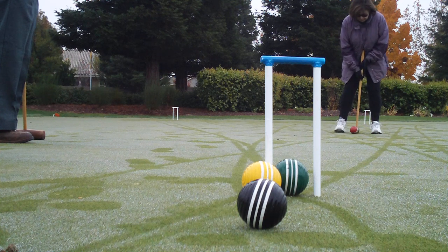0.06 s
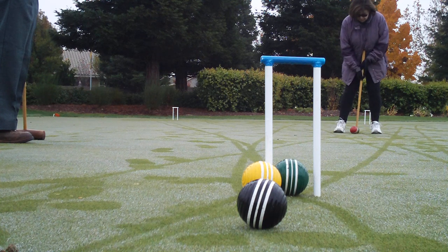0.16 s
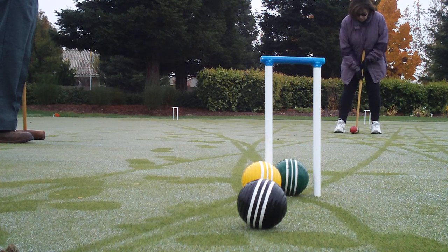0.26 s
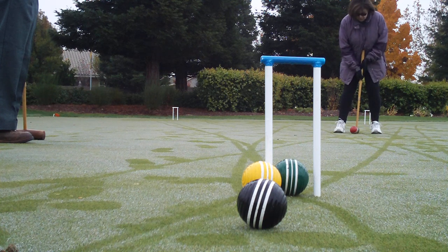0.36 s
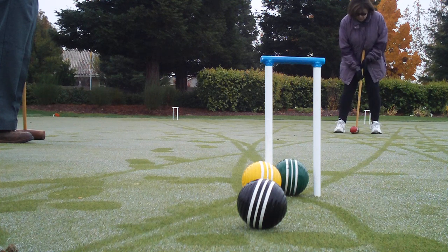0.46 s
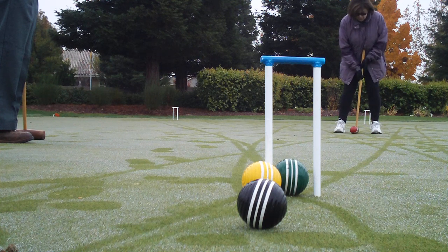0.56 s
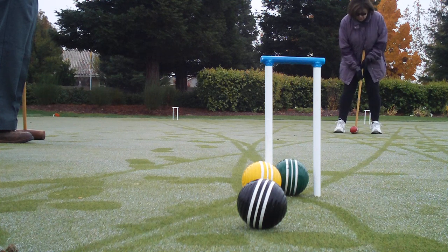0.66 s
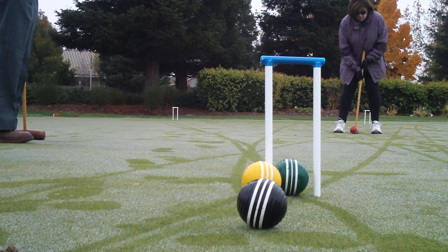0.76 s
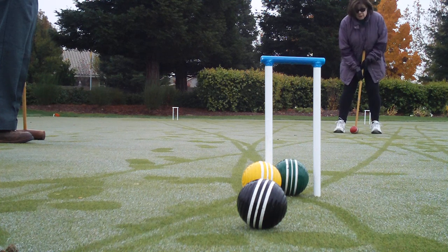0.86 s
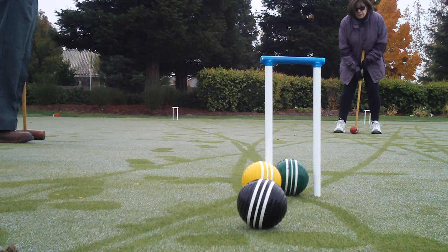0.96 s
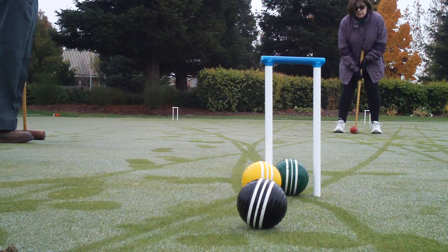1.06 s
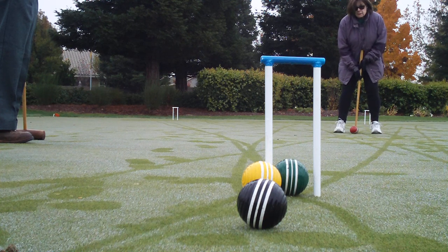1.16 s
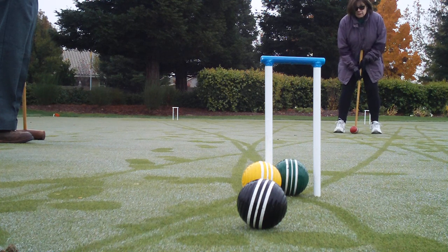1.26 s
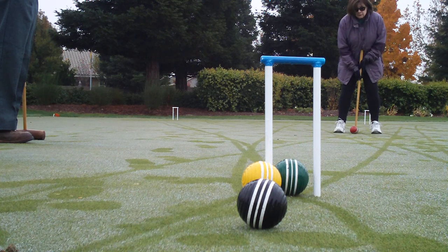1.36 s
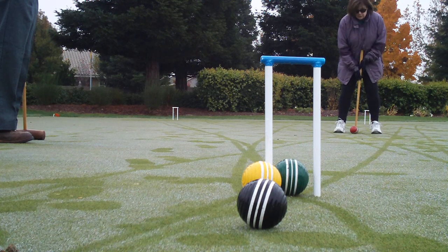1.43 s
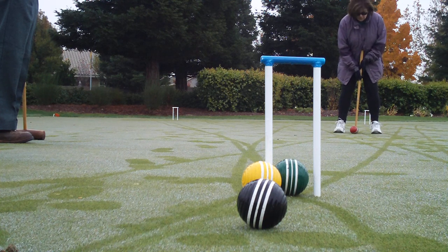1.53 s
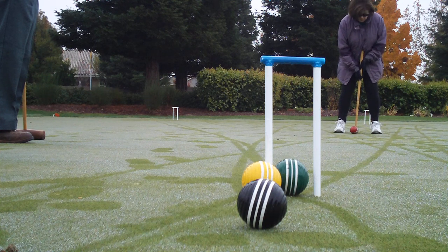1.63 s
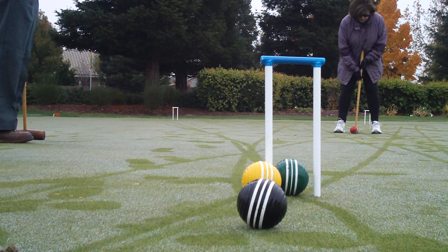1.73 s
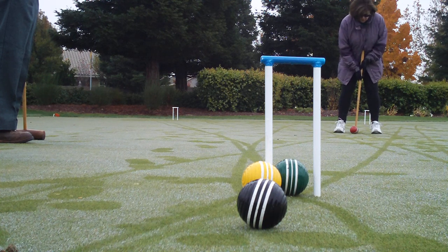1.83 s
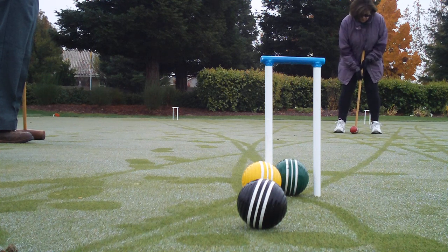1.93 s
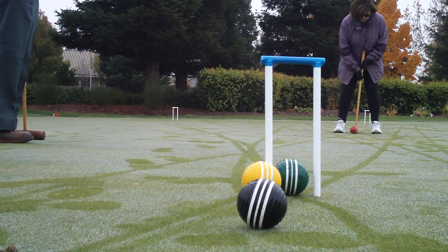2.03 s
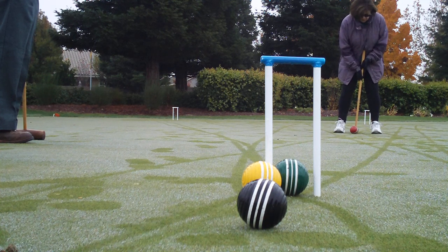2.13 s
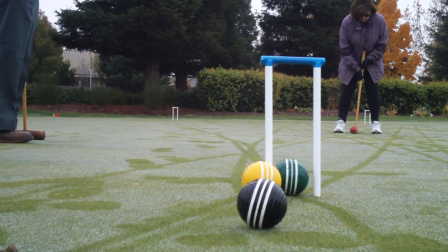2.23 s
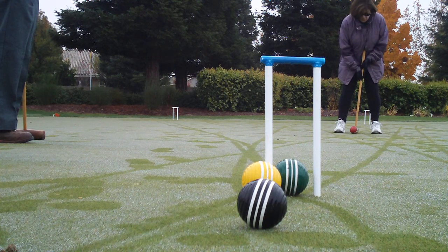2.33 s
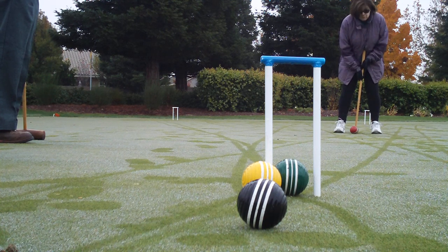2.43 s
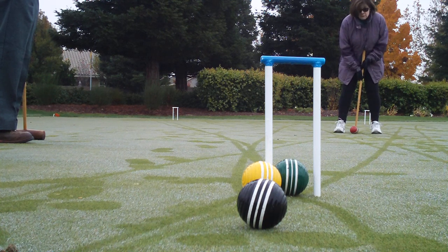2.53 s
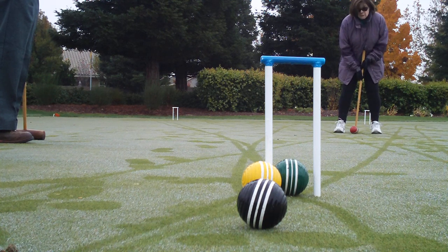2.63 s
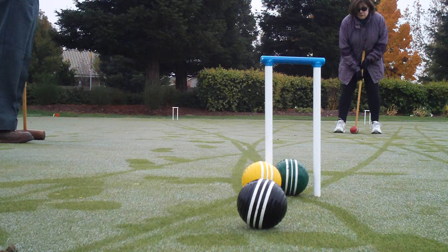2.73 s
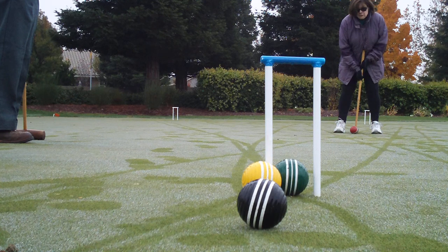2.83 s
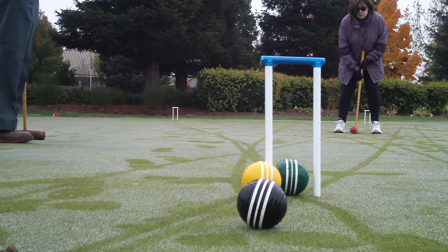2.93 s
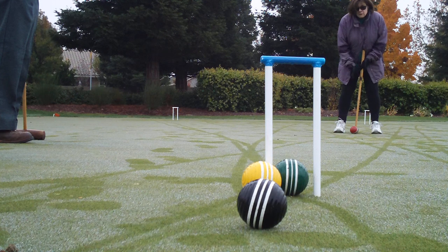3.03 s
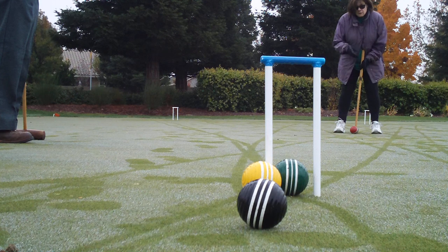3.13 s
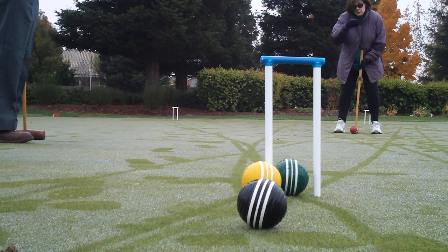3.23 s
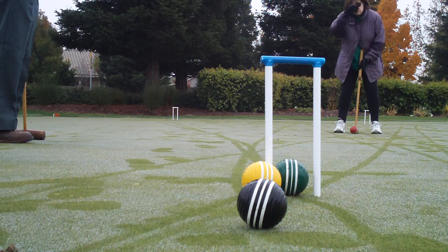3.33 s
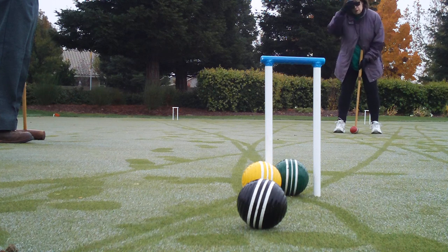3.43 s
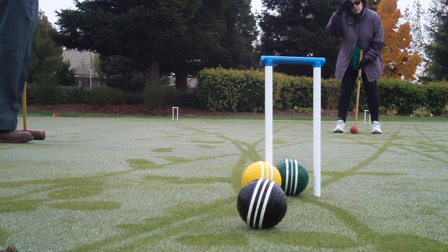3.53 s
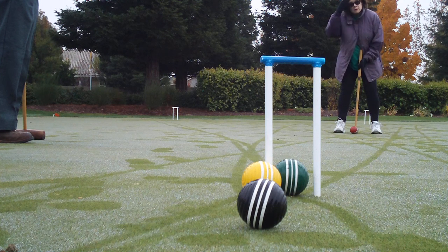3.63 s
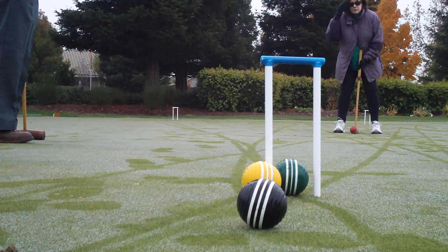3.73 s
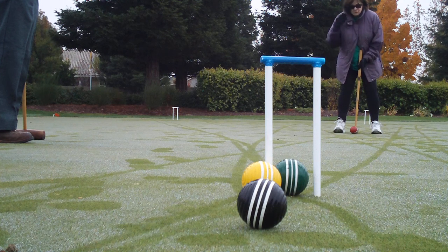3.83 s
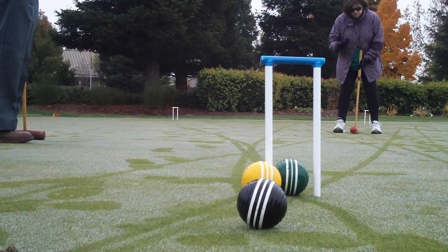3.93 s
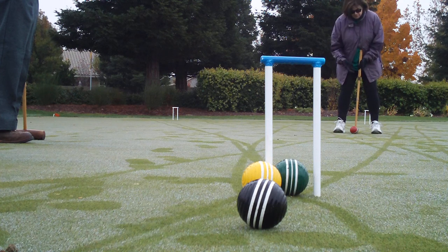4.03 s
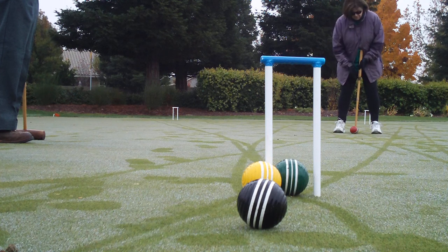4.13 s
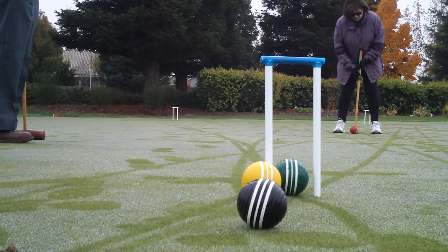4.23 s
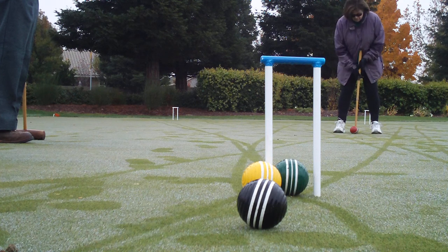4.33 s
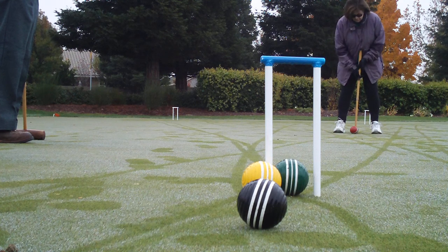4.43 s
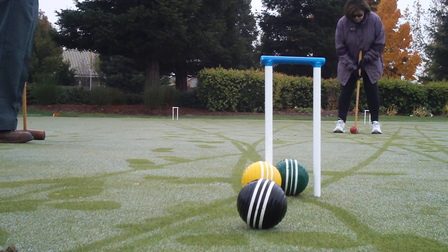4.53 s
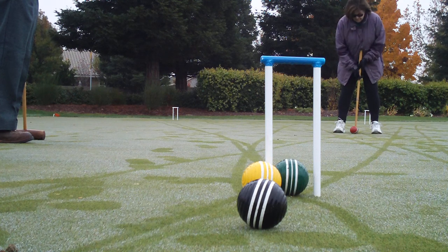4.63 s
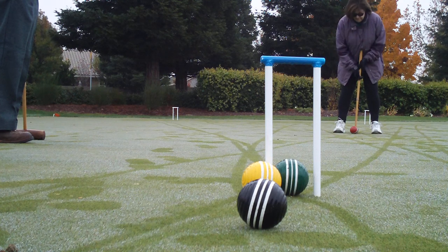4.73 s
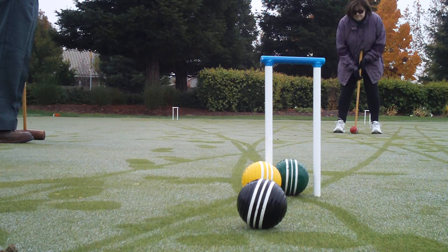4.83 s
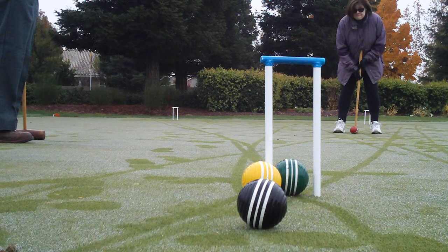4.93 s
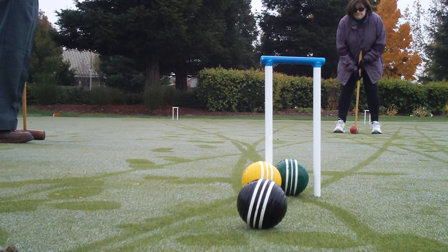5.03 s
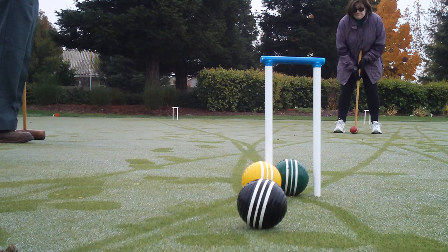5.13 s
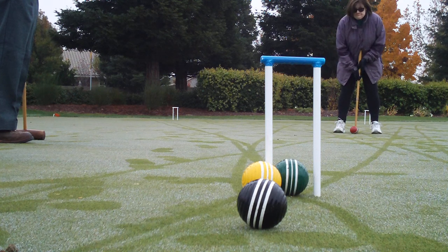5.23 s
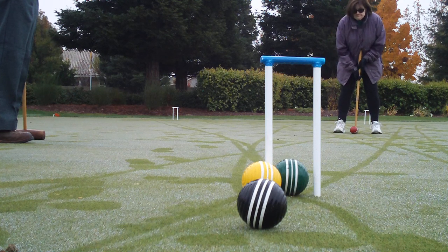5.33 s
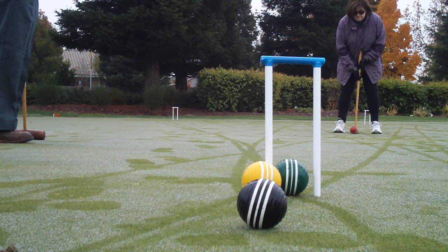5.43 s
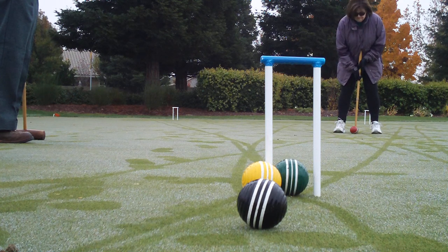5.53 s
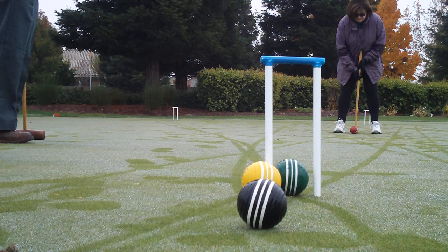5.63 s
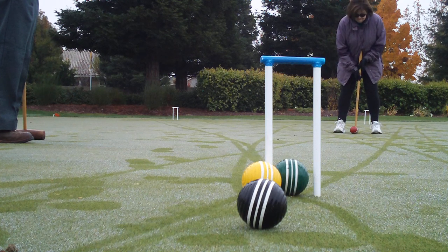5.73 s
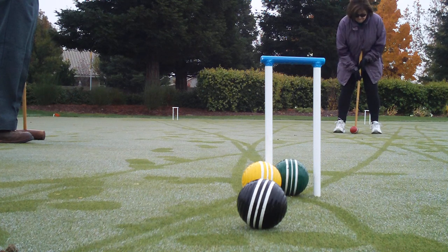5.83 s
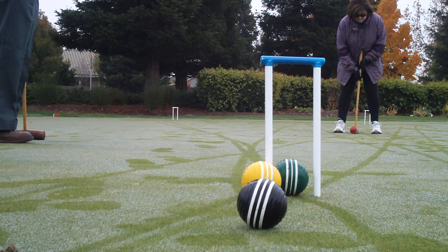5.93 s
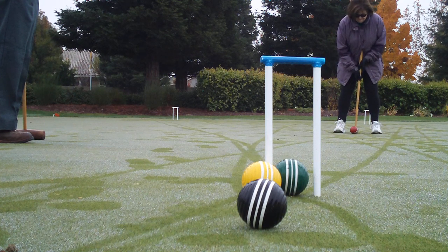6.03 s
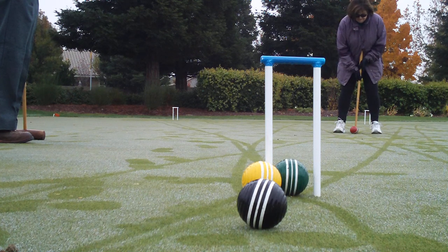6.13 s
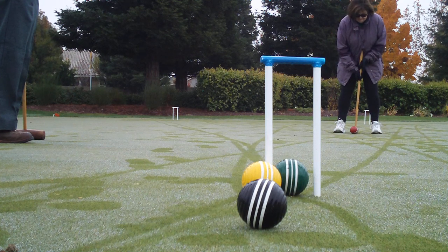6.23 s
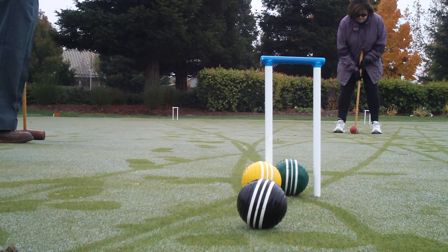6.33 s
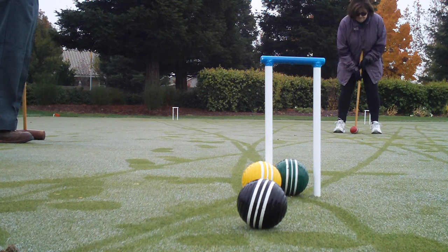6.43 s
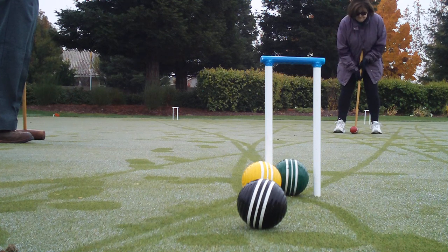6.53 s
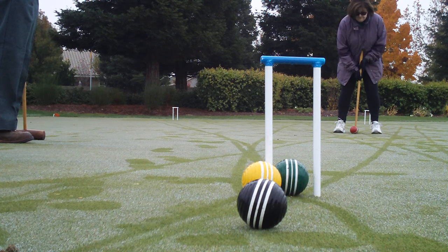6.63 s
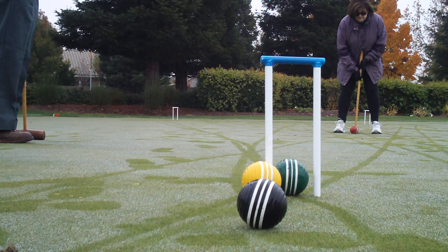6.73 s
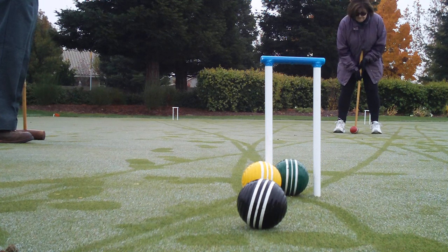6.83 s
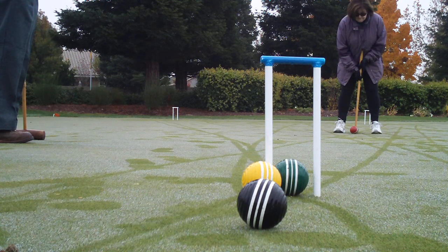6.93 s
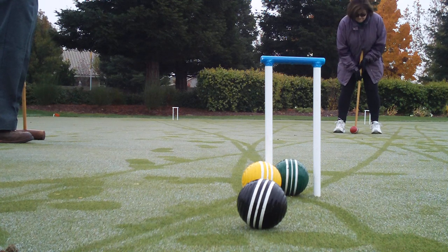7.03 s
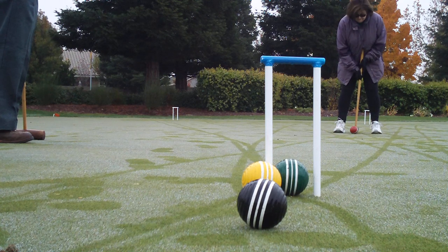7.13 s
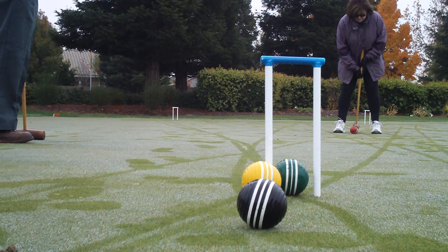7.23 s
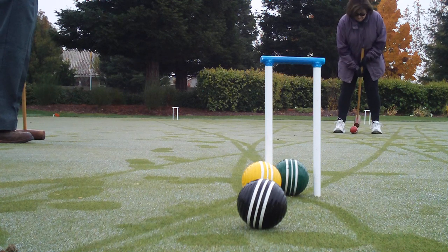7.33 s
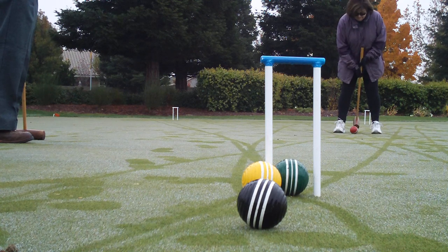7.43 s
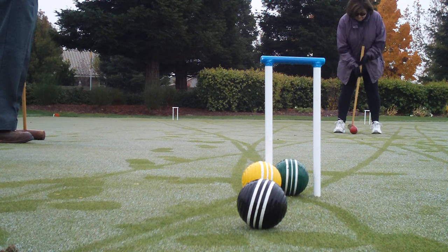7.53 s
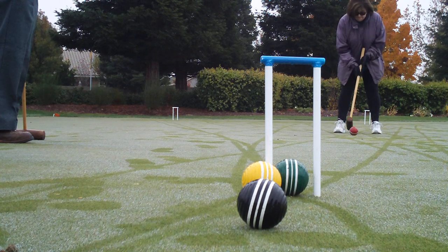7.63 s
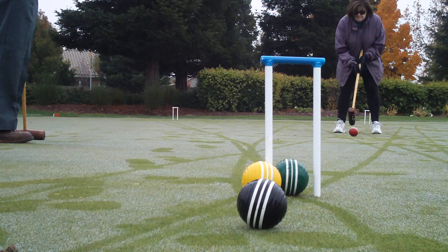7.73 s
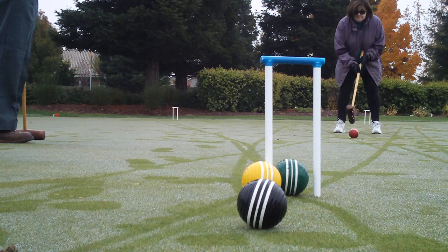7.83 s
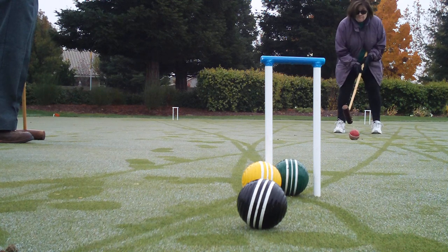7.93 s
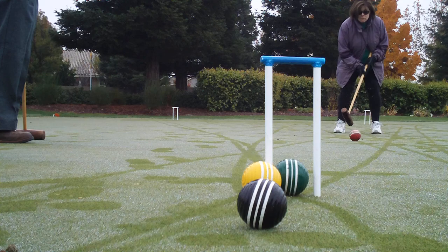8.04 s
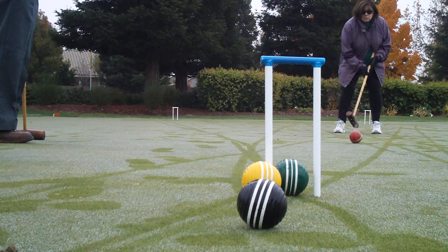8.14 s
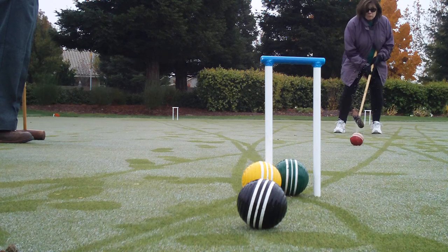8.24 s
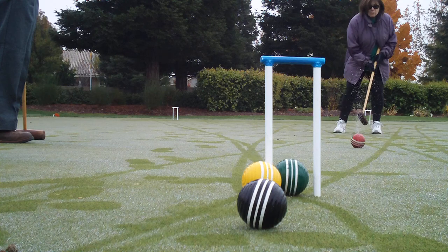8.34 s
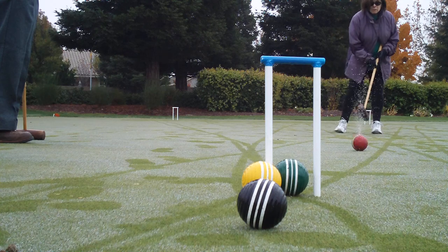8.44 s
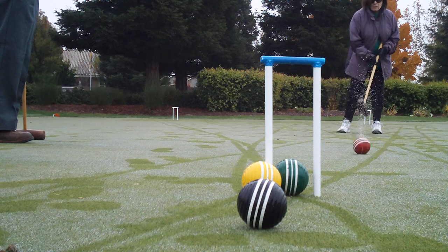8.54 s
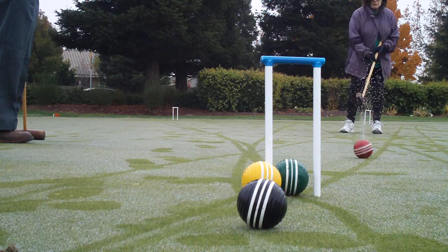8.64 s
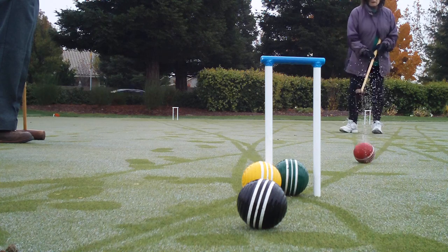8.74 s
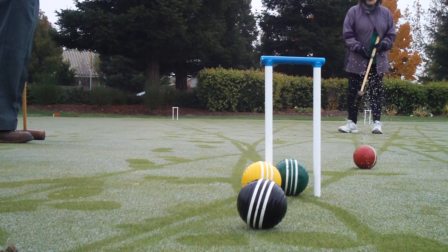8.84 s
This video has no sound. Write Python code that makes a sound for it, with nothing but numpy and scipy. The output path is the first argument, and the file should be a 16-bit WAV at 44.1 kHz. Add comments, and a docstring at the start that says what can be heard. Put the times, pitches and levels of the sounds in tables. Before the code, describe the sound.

A quiet lawn with deep distant traffic rumble, tiny bird calls and a car swelling past, broken by one loud, short mallet knock on a ball.

```python
"""An open lawn beside a town road, where a mallet cracks once against a ball.
Underneath lie shaped-noise town rumble and a far motor's hum, built from sines. Beyond the hedge a car drives by,
its noise layers rising and falling with distance. Small birds chirp in gliding sines and buzz in narrow noise.
A camera's circuits add faint hiss, whine, pips and fizz. The crack is a contact push with a swing-back,
a ground bounce, decaying ring modes and short noise bursts."""
import sys
import numpy as np
from scipy import signal
from scipy.io import wavfile
from scipy.ndimage import uniform_filter1d

SR = 44100
rng = np.random.default_rng(int(sys.argv[2]) if len(sys.argv) > 2 else 0)


def master(y):
    """Save y as 16-bit WAV."""
    cut = np.clip(np.atleast_2d(y).T, -1, 1)
    pcm = np.round(cut * 32767)  # scale
    wavfile.write(sys.argv[1], SR, pcm.astype(np.int16))


N = 391166

# Town rumble and broad hiss, spectrum shape: (frequency [Hz], relative density [dB per Hz])
RUMBLE_SPECTRUM = [(12, -25), (20, -1.5), (38, -5.5), (50, 1), (90, -1.5), (110, -6.5), (213, -17),
                   (260, -16), (310, -26.5), (430, -31), (1070, -47.5), (2600, -50.5), (4100, -47),
                   (6100, -54.5), (8700, -52.5), (15200, -60), (15400, -110)]
RUMBLE_DB = -36  # before the bass swell
# The bass of the rumble grows slowly, wanders, and surges once
BASS_RISE_DB_PER_S, BASS_WANDER_DB = 0.3156, 0.56
SURGE_S, SURGE_WIDTH_S, SURGE_DB = 7.19, 0.29, 4.5
MOTOR_HZ = 15.17
# Motor orders, drifting as the air shifts: (multiple of MOTOR_HZ, start level [dB rms], end level [dB rms])
MOTOR_ORDERS = [(2, -46, -46), (6, -50, -50), (15, -61, -62), (16, -52, -60), (17, -57, -56),
                (18, -60, -52), (22, -63, -70)]

# Hiss of opposite sign in the two channels: (frequency [Hz], relative density [dB per Hz])
SIDE_HISS_SPECTRUM = [(6, 0), (22, 14), (40, 23.5), (80, 21.5), (150, -11), (600, -9), (1200, -25.5),
                      (3000, -5), (6700, 3.5), (7000, -3), (8100, -9), (8400, 3.5), (12500, 1.5),
                      (15000, -1), (15300, -50)]
# Housing resonances in the hiss, before it pulses: (frequency [Hz], width [Hz], level [dB rms])
HOUSING_RESONANCES = [(3450, 330, -80.5), (5540, 210, -79.5), (7480, 960, -68.5), (8030, 300, -78.5),
                      (9400, 1300, -78.5), (11380, 500, -78), (12800, 700, -80), (14100, 400, -82),
                      (15150, 250, -81)]
FRAME_HZ = 30 / 1.001  # picture rate
# Thin steady circuit tones: (frequency [kHz], level [dB rms])
CLOCK_TONES = [(5, -88), (7, -90), (8, -89), (9, -92), (11, -91), (12, -92), (14, -94)]
# Whines: (multiple of the picture rate, level [dB rms], loss to the first neighbours [dB])
WHINE_CLUSTERS = [(250, -73, 8), (500, -79, 8.5)]
NEIGHBOUR_STEP_DB = 5  # further loss to the second neighbours
LONE_WHINE = (262.5, -77)  # (multiple of the picture rate, level [dB rms])
# Fizz bursts within each cycle of fifteen pictures: (start [s], relative level [dB])
FIZZ_BURSTS = [(.02, 5), (.08, 2), (.29, 2), (.38, 6), (.45, -4), (.48, 7)]
BURST_S, LULL_FROM_S, LULL_TO_S, LULL_DB = .02, .1, .38, -3.5

# Tyre roar: (frequency [Hz], relative density [dB per Hz])
TYRE_SPECTRUM = [(100, -9), (200, 6.5), (500, -9), (800, -2), (1250, -1), (2000, -5), (3500, -17),
                 (8000, -22), (14000, -45)]
# Deeper body tone of the car: (frequency [Hz], relative density [dB per Hz])
BODY_SPECTRUM = [(200, -25), (350, 1.5), (600, -1), (850, -5), (1300, -19), (3000, -18.5), (8000, -33.5)]
# Low drone of the car: (frequency [Hz], relative density [dB per Hz])
DRONE_SPECTRUM = [(50, -20), (110, -1.5), (220, 3.5), (350, -8.5), (500, -20), (1000, -52)]
# The car drives past on a straight road
NEAREST_S, ROAD_M, SPEED_M_PER_S = 7.83, 18.5, 13.2
# Base levels at the nearest point; the drone fades as distance to the power DRONE_SPREAD
ROAR_DB, DRONE_DB, DRONE_SPREAD = -49, -41.5, 0.95
# The body tone takes over from the tyres: power share 0-1 before and after the turn
BODY_BEFORE, BODY_AFTER, BODY_S, BODY_TURN_S = 0.35, 0.72, 6.4, 0.15
# The body tone swells once before the car is abreast
BOOM_S, BOOM_WIDTH_S, BOOM_DB = 6.85, 0.22, 2.5
# The tyre roar swells briefly at the nearest point
SWISH_WIDTH_S, SWISH_DB = 0.24, 2.5
# A low engine note stands out and sinks as the car passes
NOTE_S, NOTE_LENGTH_S, NOTE_FROM_HZ, NOTE_TO_HZ, NOTE_DB = 7.45, .5, 272, 222, -50

# Two-voiced rising chirps: (time [s], upper voice level [dB], lower voice level [dB])
CHIRP_NOTES = [(.919, -60, -60.5), (2.017, -60, -61), (4.179, -68, -64), (5.586, -57.5, -66),
               (6.298, -68, -73), (6.722, -64, -76)]
# Buzzy notes: (time [s], length [s], pitch [Hz], main band level [dB], upper band relative to main [dB])
BUZZ_NOTES = [(0.543, .07, 5500, -67, 0), (1.083, 0.05, 5400, -64, -7), (1.696, .065, 5400, -66.5, -3),
              (2.32, 0.042, 5400, -69, -1), (3.09, 0.041, 5560, -62, -5), (3.765, 0.086, 5380, -68.5, 0),
              (4.18, .04, 5700, -72, 0), (4.888, .045, 5450, -72, 6), (5.541, 0.043, 5550, -65, 0),
              (6.14, 0.045, 5400, -67.5, -1), (6.78, .055, 5350, -65, -1), (7.565, 0.062, 5350, -68, -6),
              (8.11, 0.046, 5400, -69, -5), (8.73, 0.059, 5500, -66.5, 2)]
BUZZ_SPLIT_HZ = 390
# Arched and falling whistles: (time [s], length [s], four pitch points [Hz, Hz, Hz, Hz], level [dB])
WHISTLE_NOTES = [(2.143, .036, 3900, 4280, 4200, 2950, -64.5), (2.194, .024, 2950, 4050, 3900, 3050, -65.5),
                 (4.553, .027, 4600, 4520, 4200, 3450, -68.5), (4.584, .038, 4250, 3800, 3450, 3150, -69.5)]

BLOW_S, BLOW_DB = 7.63061, -.3
BOUNCE_S, BOUNCE_GAIN = 0.00188, -0.18  # the knock comes back inverted off the ground
# Ring of mallet head and ball: (frequency [Hz], level within the ring [dB], decay by 60 dB [s])
HEAD_MODES = [(262, -19, 0.16), (352, -38, 0.025), (2400, -3, 0.011), (3350, -13, 0.019),
              (3700, -2.5, 0.0092), (4120, -4, .011), (4900, -4, 0.0096), (5400, -0.5, 0.008),
              (5900, -7, .011), (6620, -10, .013), (7190, -10.5, .015), (7870, -13, .013),
              (8760, -18, .012), (9080, -14.5, .012), (9610, -17, .013), (10950, -13.5, 0.0095),
              (11900, -12, 0.0095)]

# Resting voltage of each channel: (offset [fraction of full scale])
CHANNEL_OFFSETS = [
    [.0062],
    [-.0078],
]
HISS_EDGE_HZ, EDGE_HZ = 15330, 16400  # treble edges of the bed and of the whole mix


def gain_of(db):
    """Decibels to amplitude gain."""
    return 10 ** (np.asarray(db) / 20)


def evened(x):
    """Scales a sound to rms 1."""
    return x / np.sqrt(np.mean(x ** 2) + 1e-20)


def read(points, hz):
    """Reads a spectrum curve on a log-frequency axis."""
    f, value = np.transpose(points)
    return np.interp(np.log(hz + 1), np.log(f + 1), value)


def bump(t, centre_s, width_s):
    """A smooth bell that peaks at 1."""
    return np.exp(-((t - centre_s) / width_s) ** 2)


def add(mix, s, sound):
    """Mixes a sound in at time s."""
    part = mix[round(s * SR):][:len(sound)]
    part += sound[:len(part)]


def low_pass(x, edge_hz):
    """Steep treble cut in each channel."""
    taps = signal.firwin(511, edge_hz, window=("kaiser", 9), fs=SR)
    return signal.oaconvolve(x, taps[None], "same")


def noise(points, patchy_db=0.0):
    """Shaped noise at rms 1: random short-time spectra whose level varies in smooth patches."""
    frames, hz = N // 512 + 5, np.fft.rfftfreq(2048, 1 / SR)
    real, imaginary, patches = rng.standard_normal((frames, 1025, 3)).T
    patches = uniform_filter1d(patches, size=14, axis=0)  # smooth across frequency
    patches = evened(uniform_filter1d(patches, size=12, axis=1))  # and across time
    level_db = read(points, hz)[:, None] + patchy_db * patches
    spectra = (real + 1j * imaginary) * gain_of(level_db)
    return evened(signal.istft(spectra, nperseg=2048, noverlap=1536)[1][:N])


def fuzz(size, hz, width):
    """Narrow noise at rms 1: slow complex noise from two equal poles, shifted up to the pitch."""
    r = np.exp(-np.pi * width / SR)
    source = rng.standard_normal((size, 2)) @ [1, 1j]
    slow = signal.lfilter([1], np.convolve([1, -r], [1, -r]), source)
    carrier = np.exp(2j * np.pi * hz * np.arange(size) / SR)
    return evened((slow * carrier).real)


def tones(rows, unit_hz):
    """Sines of fixed pitch at multiples of one frequency, each with a random starting phase."""
    t = np.arange(N) / SR
    out = 0
    for multiple, db in rows:
        cycles = multiple * unit_hz * t + rng.random()
        out = out + np.sqrt(2) * gain_of(db) * np.sin(2 * np.pi * cycles)
    return out


def whistle(length, hz_points):
    """A sine on a polynomial pitch path through evenly spaced points, with soft ends."""
    u = np.linspace(0, 1, round(length * SR))
    point_u = np.linspace(0, 1, len(hz_points))
    hz = np.polyval(np.polyfit(point_u, hz_points, len(hz_points) - 1), u)
    sine = np.sqrt(2) * np.sin(2 * np.pi * np.cumsum(hz) / SR)
    return sine * signal.windows.tukey(len(u), .25)


def motor():
    """Hum of a far motor: sines at its orders, each gliding in level."""
    rows = [(order, np.linspace(start_db, end_db, N)) for order, start_db, end_db in MOTOR_ORDERS]
    return tones(rows, MOTOR_HZ)


def town():
    """Shaped-noise rumble whose low-passed bass is lifted by a slow swell."""
    t = np.arange(N) / SR
    wander = sum(np.sin(2 * np.pi * (hz * t + rng.random())) for hz in np.geomspace(.15, 1, 12))
    swell_db = BASS_RISE_DB_PER_S * t + BASS_WANDER_DB * evened(wander)
    swell_db += SURGE_DB * bump(t, SURGE_S, SURGE_WIDTH_S)
    rumble = noise(RUMBLE_SPECTRUM, patchy_db=1.05)
    bass = signal.sosfilt(signal.butter(2, 120, fs=SR, output="sos"), rumble)
    return gain_of(RUMBLE_DB) * (rumble + (gain_of(swell_db) - 1) * bass)


def side_hiss():
    """Thin shaped noise with opposite sign in the two channels."""
    return gain_of(-72.0) * noise(SIDE_HISS_SPECTRUM) * np.array([[1], [-1]])


def housing_hiss():
    """Hiss through the housing's resonances, which jumps and then sags once a picture."""
    hiss = sum(gain_of(db) * fuzz(N, hz, width) for hz, width, db in HOUSING_RESONANCES)
    frame = np.arange(N) / SR * FRAME_HZ % 1  # position within the picture, 0-1
    jump, sag = bump(frame, .325, .03), bump(frame, .46, .07)
    return hiss * gain_of(6.8 * jump - 12.0 * sag)


def pips():
    """A short high sine pip every third picture, with each fifth pip skipped."""
    t = np.arange(N) / SR
    beats = t * FRAME_HZ / 3
    gate = (abs(beats % 1 - .5) < .06) * (beats // 1 % 5 != 3)
    soft_gate = uniform_filter1d(gate * 1., size=60)
    return gain_of(-67.5) * soft_gate * np.sin(2 * np.pi * 7777 * t)


def fizz():
    """Narrow noise stepped in level by a repeating pattern of bursts and a lull."""
    cycle = np.arange(N) / SR % (15 / FRAME_HZ)
    level_db = LULL_DB * (cycle > LULL_FROM_S) * (cycle < LULL_TO_S)
    for s, db in FIZZ_BURSTS:
        level_db = level_db + db * (cycle > s) * (cycle < s + BURST_S)
    smooth_db = uniform_filter1d(level_db * 1., size=100)
    return gain_of(-73.5 + smooth_db) * fuzz(N, 4850, 340)


def whine():
    """Sine whines with two neighbours either side, one picture rate apart, plus a lone whine."""
    rows = [LONE_WHINE]
    for multiple, db, first_db in WHINE_CLUSTERS:
        for n in range(-2, 3):
            loss_db = (n != 0) * first_db + (abs(n) == 2) * NEIGHBOUR_STEP_DB
            rows.append((multiple + n, db - loss_db))
    return tones(rows, FRAME_HZ)


def camera():
    """The camera's circuits: pulsing hiss, pips, fizz, whines and thin steady tones."""
    return housing_hiss() + pips() + fizz() + whine() + tones(CLOCK_TONES, 1000)


def car():
    """Roar falling as inverse distance, a drone with its own distance law, and a sinking engine note."""
    t = np.arange(N) / SR
    near = ROAD_M / np.hypot(ROAD_M, SPEED_M_PER_S * (t - NEAREST_S))  # 1 at the nearest point
    turned = .5 + .5 * np.tanh((t - BODY_S) / BODY_TURN_S)
    share = np.clip(BODY_BEFORE + (BODY_AFTER - BODY_BEFORE) * turned, 0, 1)
    boom = gain_of(BOOM_DB * bump(t, BOOM_S, BOOM_WIDTH_S))
    swish = gain_of(SWISH_DB * bump(t, NEAREST_S, SWISH_WIDTH_S))
    tyres = np.sqrt(1 - share) * noise(TYRE_SPECTRUM, patchy_db=1.0)
    body = boom * np.sqrt(share) * noise(BODY_SPECTRUM, patchy_db=1.5)
    # the swish lifts tyres only
    roar = gain_of(ROAR_DB) * near * (swish * tyres + body)
    drone = gain_of(DRONE_DB) * near ** DRONE_SPREAD * noise(DRONE_SPECTRUM, patchy_db=1.5)
    out = roar + drone
    add(out, NOTE_S, gain_of(NOTE_DB) * whistle(NOTE_LENGTH_S, [NOTE_FROM_HZ, NOTE_TO_HZ]))
    return out


def trees(calls):
    """Adds scatter from the trees: the calls convolved with a short decaying noise tail."""
    t = np.arange(9000) / SR
    tail = rng.standard_normal(len(t)) * gain_of(-60 * t / .6)
    return calls + gain_of(-6) * signal.oaconvolve(calls, tail / np.linalg.norm(tail))[:N]


def birds():
    """Gliding-sine chirps and whistles and narrow-noise buzzes, scattered by the trees."""
    calls = np.zeros(N)
    for s, upper_db, lower_db in CHIRP_NOTES:
        add(calls, s, gain_of(upper_db) * whistle(.019, [5350, 6250, 6950]))
        add(calls, s, gain_of(lower_db) * whistle(.024, [3600, 5050, 5950]))
    for s, length, hz, db, upper_db in BUZZ_NOTES:
        size = round(length * SR)
        # a fast trill is heard as a main band and an upper one
        note = fuzz(size, hz, 160) + gain_of(upper_db) * fuzz(size, hz + BUZZ_SPLIT_HZ, 200)
        add(calls, s, gain_of(db) * note * signal.windows.tukey(size, .5))
    for s, length, *hz_points, db in WHISTLE_NOTES:
        add(calls, s, gain_of(db) * whistle(length, hz_points))
    return trees(calls)


def contact_knock(t):
    """A half-millisecond push, from which the struck ball swings back through one broad low mode."""
    push = np.sin(np.pi * np.clip(t / .0005, 0, 1)) ** 1.5
    r, turn = np.exp(-np.pi * 500 / SR), 2 * np.pi * 610 / SR  # width 500 Hz, pitch 610 Hz
    swing = signal.lfilter([1], [1, -2 * r * np.cos(turn), r * r], push)
    knock = push - .0098 * swing
    return knock / knock.max()


def head_ring(t):
    """Decaying sine modes of mallet head and ball that build up just after contact."""
    rise = 1 - np.exp(-(t / 0.0015) ** 2)
    modes = sum(gain_of(db - 60 * t / t60) * np.sin(2 * np.pi * hz * t) for hz, db, t60 in HEAD_MODES)
    return rise * modes


def mallet():
    """The blow: knock, ground bounce, ring, decaying noise rattle and snap, and one far hedge echo."""
    t = np.arange(SR // 5) / SR
    knock = contact_knock(t)
    bounce = BOUNCE_GAIN * np.interp(t - BOUNCE_S, t, knock)
    ring = gain_of(-8.5) * head_ring(t)
    band = signal.butter(2, [1500, 9000], "band", fs=SR, output="sos")
    rattle_grit, hedge_grit = signal.sosfilt(band, rng.standard_normal((2, len(t))))
    rattle = gain_of(-23 - 60 * t / .017) * (1 - np.exp(-t / .0005)) * rattle_grit
    snap = gain_of(-26 - 60 * t / .005) * fuzz(len(t), 12900, 4000)
    # the echo is a soft noise puff
    hedge = gain_of(-53.0) * bump(t, .122, 0.023) * hedge_grit
    out = np.zeros(N)
    add(out, BLOW_S, gain_of(BLOW_DB) * (knock + bounce + ring + rattle + snap + hedge))
    return out


def scene():
    """Same sound in both channels but for the side hiss; a trace of the blow skips the first treble cut."""
    bed = town() + motor() + side_hiss() + camera() + car() + birds()
    blow, trace = mallet(), gain_of(-14)
    return low_pass(bed + (1 - trace) * blow, HISS_EDGE_HZ) + trace * blow


def record(dry):
    """Adds the channel offsets, clips at full scale, then cuts the top treble."""
    return low_pass(np.clip(dry + np.array(CHANNEL_OFFSETS), -1, 1), EDGE_HZ)


dry = scene()
out = record(dry)
master(out)
```